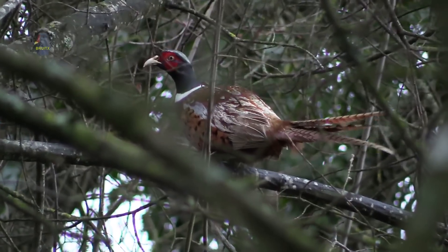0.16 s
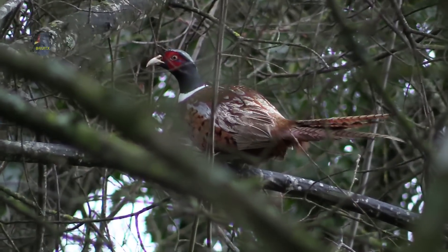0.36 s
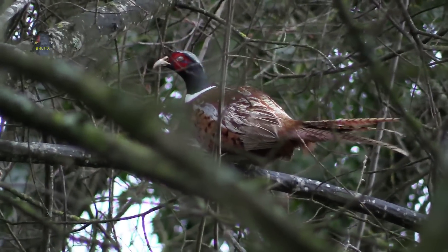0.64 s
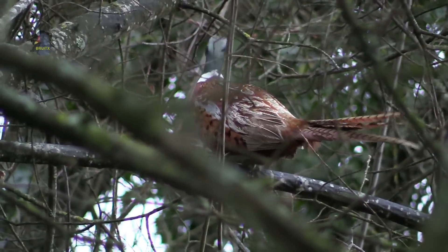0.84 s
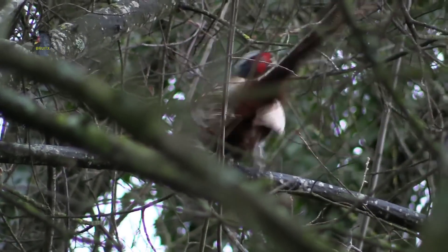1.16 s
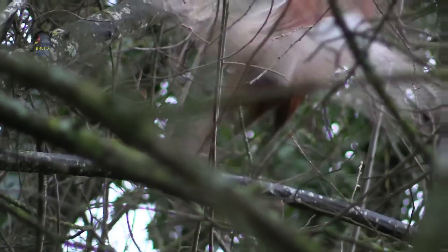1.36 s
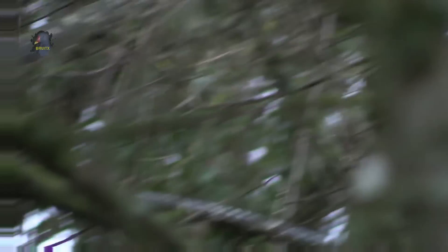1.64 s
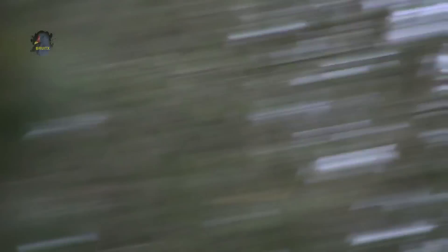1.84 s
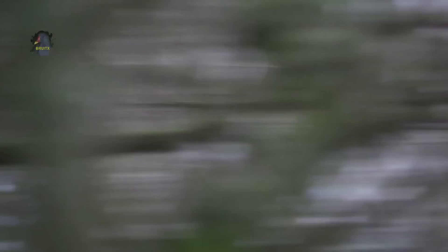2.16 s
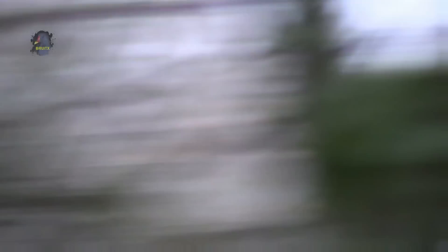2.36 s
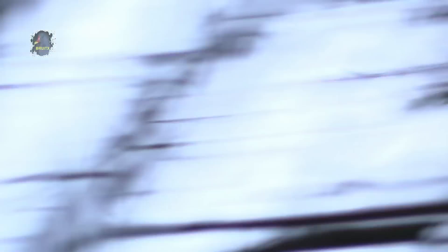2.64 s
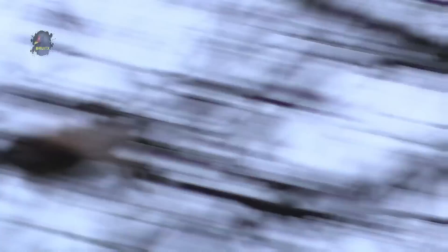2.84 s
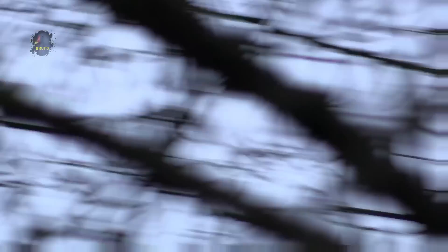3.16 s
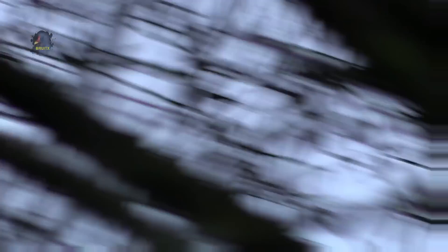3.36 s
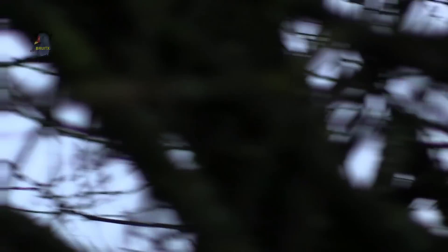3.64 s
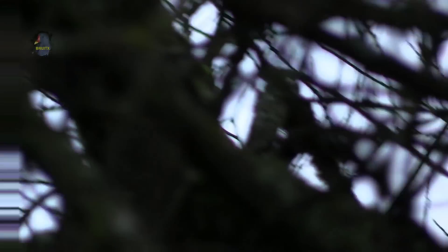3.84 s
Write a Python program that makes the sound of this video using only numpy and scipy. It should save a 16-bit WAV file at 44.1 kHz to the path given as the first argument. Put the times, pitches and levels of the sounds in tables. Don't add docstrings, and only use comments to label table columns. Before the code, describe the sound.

Quiet woodland with low wind rumble and tiny ticks, then a hard wing clap, fluttering strokes and a quick run of hoarse, metallic pheasant calls, slowing and dulling with distance, trees scattering short echoes.

```python
import sys
import numpy as np
from scipy import signal
from scipy.fft import rfft, irfft
from scipy.io import wavfile
from scipy.ndimage import uniform_filter1d

SR = 44100
rng = np.random.default_rng(int(sys.argv[2]) if len(sys.argv) > 2 else 0)


def attenuation_scalar(level_db):
    decades = np.asarray(level_db, float) / 20
    return 10 ** decades


def store_pcm(level_fs):
    pcm = np.round(np.clip(level_fs, -1, 1) * 32767).astype(np.int16)
    wavfile.write(sys.argv[1], SR, np.atleast_2d(pcm).T)


N = 176400

# start_s, length_s, effort_db, settled_pitch_hz, brightness_db
CACKLE = [(1.738, 0.039, -9.5, 798, 2.5), (1.833, 0.038, -11.5, 858, -4), (1.933, 0.068, -9, 673.4, 4.5),
          (2.073, 0.047, -7, 791, 2), (2.192, 0.054, -9, 683, 7.5), (2.333, 0.055, -10, 779, 3),
          (2.485, 0.063, -15.5, 773, -4), (2.656, 0.063, -11, 722, -0.5), (2.803, 0.076, -13.5, 767, -7.5),
          (2.97, 0.064, -10, 722, 3), (3.115, 0.05, -14.5, 741.6, 3.5), (3.266, 0.059, -14, 746.4, -1),
          (3.45, 0.065, -13.5, 803.6, -3.5), (3.642, 0.05, -10, 671, -19.5), (3.726, 0.028, -14, 770, -21),
          (3.86, 0.074, -14, 698.4, -11.5)]
STEADY_DB = [-10, -1, -8, -4, -4.5, 0.5, 1.5, -3, 2.5, 2.5, 1, -8, -2, 5, -4, 1.5]
# middle_resonance_db, start_to_end_change_db
SHADES = [(-3, -3.5), (5.5, 0), (0, -7), (3, -7), (-4, -5.5), (-2, -3), (1, 2.5), (-1.5, -2.5), (3.5, -1.5),
          (-1, -5.5), (-1.5, 0.5), (-1.5, -3), (2.5, -1.5), (6.5, -5.5), (12.5, -7.5), (8.5, -5)]
# start_s, length_s, effort_db,
# settled_pitch_hz, brightness_db
OPENING = [
    (1.504, 0.041, -17, 988, 5),
    (1.555, 0.066, -10, 830, 5),
]
# start_s, length_s, effort_db, settled_pitch_hz, brightness_db
YELP = [
    (1.655, 0.023, -7, 1044, -2),
]
# start_s, length_s, effort_db, pitch_hz, brightness_db
CLEAR_TONES = [
    (2.232, .03, -17, 1280, 6),
    (3.322, .038, -18, 1200, 3),
    (2.232, .03, -16, 650, -8),
    (3.353, .012, -22, 740, -12),
]
# centre_hz, width_hz, level_db, brightness_share (0-1)
WINDPIPE = [(911, 375, 2, 0), (1680, 400, -29, 0.8), (2241, 152, -2.5, 0.42), (2685, 1200, -20, 0.74),
            (3948, 337, -0.5, 0.34), (4640, 400, -13.5, 0.33), (5280, 480, -12, 0.33),
            (6540, 700, -22.5, 1), (8700, 780, -26, 0.42), (11200, 14000, -54, 1)]
# time_s, peak_db, length_s, dullness_hz
CLAPS = [(1.390, -49, 0.0076, 2400), (1.4235, -15, 0.001, 1500), (1.4288, -5, 0.0008, 1200),
         (1.4325, -13, 0.0015, 800), (1.443, -18, 0.004, 900), (1.4815, -20, 0.001, 800),
         (1.4845, -13, 0.0007, 2200), (1.5603, -17, 0.0013, 7000), (1.717, -25, 0.0015, 4500),
         (1.798, -32, 0.001, 5000), (1.8996, -30, 0.001, 9000), (2.4464, -38, 0.002, 6000),
         (2.4674, -32, 0.001, 8000), (2.6365, -38, 0.0015, 6000), (1.246, -49, 0.0036, 5000),
         (0.941, -49, .003, 4000)]
# time_s, level_db
STROKES = [(1.425, -17), (1.549, -15), (1.629, -14.5), (1.707, -14.5), (1.762, -26), (1.814, -19),
           (1.882, -12), (1.949, -40), (2.268, -21), (2.304, -25), (2.518, -19), (3.163, -27), (3.23, -23)]
# time_s, level_db, pitch_hz
SWISHES = [
    (2.447, -23, 2650),
    (2.469, -27, 2950),
    (3.118, -24, 2600),
    (3.23, -27, 2550),
    (3.585, -31, 2400),
    (3.165, -27, 480),
    (3.25, -28, 480),
]
# frequency_hz, level_db
FEATHERS = [(60, -4), (150, -1.5), (300, 3.5), (500, 0), (1500, -1.5), (5000, -12.5), (10000, -19),
            (16000, -56)]
# frequency_hz, t60_s
WOOD_DECAY = [(300, 1), (900, 0.48), (2200, 0.63), (4000, 0.66), (8500, 0.73), (15000, 0.29)]
# time_s, level_db, pitch_hz
TICKS = [
    (0.135, -38, 2710),
    (0.193, -40.5, 2870),
    (0.2973, -39.5, 2780),
    (0.321, -44, 2550),
    (0.5153, -43, 2550),
    (0.5713, -43, 2480),
]
# start_s, length_s, level_db, pitch_hz, width_hz
SONGBIRDS = [
    (.01, .06, -60, 1960, 30),
    (.17, .07, -59, 1930, 30),
    (.33, .06, -57, 1850, 30),
    (.51, .08, -59, 1790, 30),
    (.82, .05, -56, 1730, 40),
    (.37, .2, -63, 6150, 450),
    (.6, .21, -63, 5900, 900),
    (.3, .65, -64, 4500, 500),
]
# frequency_hz, level_db (per Hz)
FAR_WASH = [(59, -72), (100, -9), (206, -5.5), (254, -2.5), (314, -2), (357, -7), (907, -12), (2850, -30.5),
            (15900, -42)]
# frequency_hz, level_db (per Hz)
WIND = [(8.8, -36), (15, -9.5), (59, -1.5), (133, -15), (166, -7), (188, -10), (400, -25), (520, -80),
        (880, -120)]
# time_s, level_db
GUSTS = [
    (0.0, -31),
    (0.24, -35),
    (0.38, -39.5),
    (0.85, -35.5),
    (1.54, -48),
    (1.79, -33.5),
    (1.9, -39),
    (3.87, -42.5),
    (4.0, -45),
]
# frequency_hz, level_db (per Hz)
SIDE_HISS = [(18, -31), (30, -1), (492, -2), (1020, -11), (1140, -14), (1400, -8), (3980, -10), (7080, -4),
             (15500, -24)]

ONSET_HZ, OPENING_ONSET_HZ, STEADY_HZ, SETTLE_S, END_LIFT = 1130, 660, 990, 0.012, -0.05
RISE_S, FALL_S, SAG_DB, FLUTTER_DB = 0.014, 0.0069, -5.5, 1.5
WANDER, JITTER, BREATH = 0.065, 0.06, 0.21
RASP_DB, RASP_S = 1.8, 0.0016
SWELL_DB, SWELL_AT = -14, 0.45
HISS_DB, HISS_FADE_DB_PER_S, HISS_HZ = -30, -2, 8000
RECEDE_PER_S, BEAK_SAG, BEAK_CHANCE = 0.025, 0.025, 0.015
TAKEOFF_S, TAKEOFF_CRACK_S, STROKE_S = 1.425, 1.4225, 0.012
RUSH_DB, RUSH_FADE_DB_PER_S = -30.5, -8
SPRAY_DB, SPRAY_FADE_DB_PER_S, SPRAY_HZ = -53, -10, 12000
WOOD_DB, SIDE_ECHO_DB = -9.5, -26.5
TRUNKS_DB, TRUNK_S = 4.5, 0.008
WASH_DB, SIDE_DB = -42, -58
LIMIT, EDGE_HZ = 0.58, 15750


def evened(x):
    return x / np.sqrt(np.mean(x ** 2) + 1e-20)


def read(points, hz):
    f, value = np.transpose(points)
    return np.interp(np.log(hz + 1), np.log(f + 1), value)


def add(mix, s, sound):
    part = mix[round(s * SR):][:len(sound)]
    part += sound[:len(part)]


def noise(shape):
    gain = attenuation_scalar(read(shape, np.fft.rfftfreq(N, 1 / SR)))
    return evened(irfft(rfft(rng.standard_normal(N)) * gain, N))


def smoothed(x, span):
    return uniform_filter1d(uniform_filter1d(x, span), span)


def drift(size, seconds):
    span = max(int(seconds * SR), 1)
    x = evened(smoothed(rng.standard_normal(8192), span))[:size]
    return np.tanh((x - x.mean()) / 2) * 2


def resonate(x, hz, width):
    turn = np.exp(2j * np.pi * np.cumsum(hz * np.ones(len(x))) / SR)
    r = np.exp(-np.pi * width * 1.5 / SR)
    return 2 * (turn * signal.lfilter([(1 - r) ** 2], [1, -2 * r, r * r], x / turn)).real


def membrane(pitch, size, rough):
    shake = rough * WANDER * drift(size, 0.00865) + rough * JITTER * drift(size, 0.00081)
    turns = np.cumsum(pitch * (1 + shake)) / SR
    return evened(sum((k % 2 or np.sqrt(rough)) * np.cos(2 * np.pi * k * turns) for k in range(1, 15)))


def windpipe(drive, open_db, middle_db, beak):
    voice = 0
    for k, (hz, width, db, share) in enumerate(WINDPIPE):
        level = attenuation_scalar(db + share * open_db + middle_db * (k == 2))
        voice = voice + (-1) ** k * level * resonate(drive, hz * beak[k], width)
    return evened(voice)


def note(start, length, effort_db, low_hz, bright_db, rough,
         onset_hz=ONSET_HZ, steady_db=-3, middle_db=0, sag_db=SAG_DB):
    t = np.arange(0, length + 4 * FALL_S, 1 / SR)
    flown = start - TAKEOFF_S
    recede = 1 - RECEDE_PER_S * flown
    lift = (onset_hz > STEADY_HZ) * rough * END_LIFT * (t / length) ** 2
    slide = rough * (onset_hz * recede ** 2 - low_hz) * np.exp(-(t / SETTLE_S) ** 2)
    hz = low_hz * (1 + lift) + slide

    air_flow = rng.standard_normal(8192)[:len(t)]
    drive = BREATH * rough * air_flow
    drive = drive + membrane(hz, len(t), rough)
    drive = drive + attenuation_scalar(steady_db) * rough * membrane(STEADY_HZ * recede, len(t), rough)
    drive = drive * attenuation_scalar(rough * RASP_DB * drift(len(t), RASP_S))

    open_db = bright_db + SWELL_DB * (t / length - SWELL_AT) ** 2
    chance = BEAK_CHANCE * rng.standard_normal(len(WINDPIPE))[:, None]
    beak = recede * (1 + chance - BEAK_SAG * t / length)
    voice = windpipe(drive, open_db, middle_db, beak)
    hiss_level = attenuation_scalar(HISS_DB + HISS_FADE_DB_PER_S * flown + open_db)
    hiss = hiss_level * evened(resonate(air_flow, HISS_HZ, 5000))

    rise = np.sin(np.minimum(t / RISE_S, 1) * np.pi / 2) ** 2
    fall = np.exp(-(np.maximum(t - length, 0) / FALL_S) ** 2)
    flutter_db = rough * FLUTTER_DB * drift(len(t), 0.0033)
    level = attenuation_scalar(effort_db + sag_db * t / length + flutter_db)
    return start, rise * fall * level * (voice + hiss)


def pheasant():
    out = np.zeros(N)
    for row, db, (middle_db, sag_db) in zip(CACKLE, STEADY_DB, SHADES):
        add(out, *note(*row, 1.0, steady_db=db, middle_db=middle_db, sag_db=sag_db))
    add(out, *note(*OPENING[1], 1, STEADY_HZ, steady_db=3, middle_db=3, sag_db=-4))
    groups = ((OPENING[:1], 0.65, OPENING_ONSET_HZ), (YELP, 0.6, STEADY_HZ), (CLEAR_TONES, 0.3, ONSET_HZ))
    for rows, rough, onset_hz in groups:
        for row in rows:
            add(out, *note(*row, rough, onset_hz, steady_db=-21.5, middle_db=2.5, sag_db=-6.0))
    return out


def claps():
    out, u = np.zeros(N), np.arange(2000) / SR
    for s, db, length, hz in CLAPS:
        r = np.exp(-2 * np.pi * hz / SR)
        burst = signal.lfilter([1, 0.8, -0.9, -0.7], [1, -2 * r, r * r], rng.standard_normal(2000))
        add(out, s - 0.001, attenuation_scalar(db) * evened(burst) * u / length * np.exp(1 - u / length) / 2)
    return out


def swishes():
    out = np.zeros(N)
    for s, db, hz in SWISHES:
        whistle = evened(resonate(rng.standard_normal(1000), hz, 300))
        add(out, s - 0.012, attenuation_scalar(db) * np.hanning(1000) ** 2 * whistle)
    return out


def feathers():
    t = np.arange(N) / SR
    flown = t - TAKEOFF_S
    puffs = sum(attenuation_scalar(db - 11.5) * np.exp(-((t - s - STROKE_S / 2) / STROKE_S) ** 2) for s, db in STROKES)
    rush = (t > TAKEOFF_S) * attenuation_scalar(RUSH_DB + RUSH_FADE_DB_PER_S * flown)
    spray_level = np.clip(flown / 0.13, 0, 1) * attenuation_scalar(SPRAY_DB + SPRAY_FADE_DB_PER_S * flown)
    spray = spray_level * evened(resonate(rng.standard_normal(N), SPRAY_HZ, 5000))
    before_crack = np.where(t < TAKEOFF_CRACK_S, 0.1, 1)
    return spray + (puffs + rush) * before_crack * noise(FEATHERS)


def wood(x):
    taps = np.zeros(SR)
    at = np.arange(500, SR - 20, 20)
    signs = rng.choice([-1., 1.], len(at))
    uneven = attenuation_scalar(TRUNKS_DB * drift(8192, TRUNK_S / 20))[:len(at)]
    taps[at + rng.integers(0, 20, len(at))] = signs * uneven
    hz, t, z = signal.stft(taps, SR, nperseg=256)
    tail = signal.istft(z * attenuation_scalar(-60 * t / read(WOOD_DECAY, hz)[:, None]), SR, nperseg=256)[1]
    return signal.fftconvolve(x, tail / np.linalg.norm(tail))[:N]


def ticks():
    out, u = np.zeros(N), np.arange(600) / SR
    for s, db, hz in TICKS:
        ring = sum(a * np.sin(2 * np.pi * ratio * hz * u) for a, ratio in ((1, 1), (0.43, 1.3), (0.35, 1.86)))
        add(out, s - 0.001, attenuation_scalar(db + 1) * ring * u / 0.0007 * np.exp(1 - u / 0.0007))
    return out


def songbirds():
    out = np.zeros(N)
    for s, length, db, hz, width in SONGBIRDS:
        hiss = rng.standard_normal(SR)[:int(length * SR)]
        swell = np.sin(np.pi * np.arange(len(hiss)) / len(hiss)) ** 0.5
        add(out, s, attenuation_scalar(db) * swell * evened(resonate(hiss, hz, width)))
    return out


def air():
    s, db = np.transpose(GUSTS)
    lumps_db = 0.66 * evened(smoothed(rng.standard_normal(N), 1500))
    gusts = attenuation_scalar(np.interp(np.arange(N) / SR, s, db) + lumps_db)
    return attenuation_scalar(WASH_DB) * noise(FAR_WASH) + gusts * noise(WIND + [(800, -58), (20000, -86)])


def scene():
    bird = pheasant() + (claps() + swishes() + feathers())
    mid = bird + attenuation_scalar(WOOD_DB) * wood(bird) + ticks() + songbirds() + air()
    sharp_bird = np.diff(bird, 2, prepend=[0, 0])
    side = attenuation_scalar(SIDE_DB) * noise(SIDE_HISS) + attenuation_scalar(SIDE_ECHO_DB) * wood(sharp_bird)
    return np.array([mid + side, mid - side])


def low_pass(x):
    return signal.sosfilt(signal.butter(12, 16030, fs=SR, output="sos"), x)


def record(dry):
    held = dry / (1 + (dry / LIMIT) ** 6) ** (1 / 6)
    edge = signal.firwin(511, EDGE_HZ, window=("kaiser", 9), fs=SR)
    mix = signal.oaconvolve(held, edge[None], "same")
    return low_pass(mix)


dry = scene()
out = record(dry)
store_pcm(out)
```